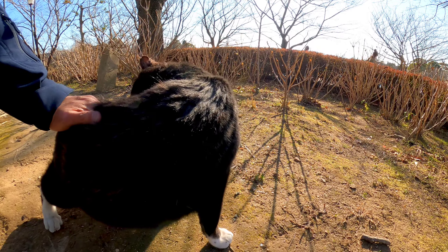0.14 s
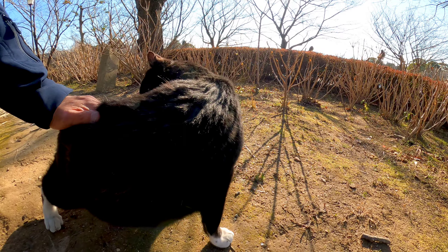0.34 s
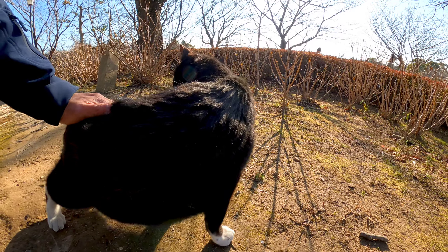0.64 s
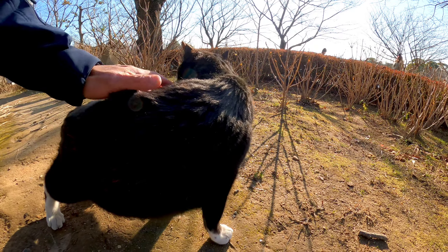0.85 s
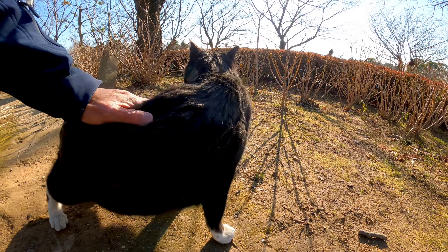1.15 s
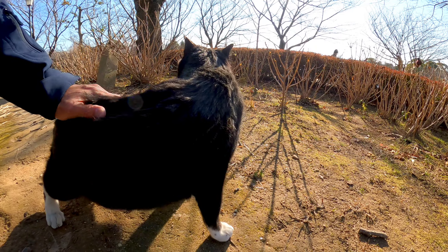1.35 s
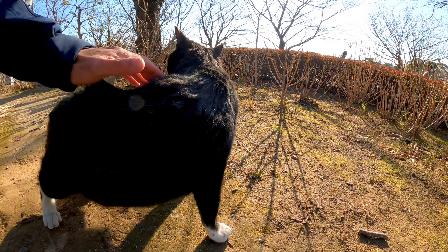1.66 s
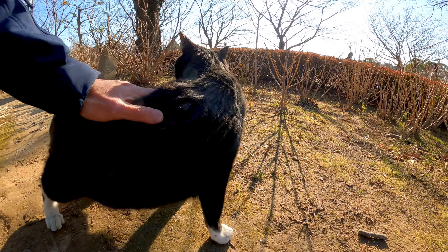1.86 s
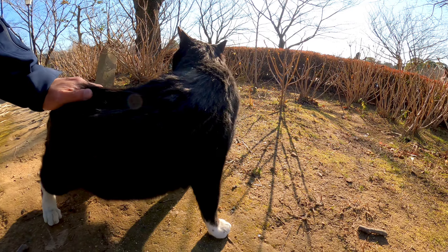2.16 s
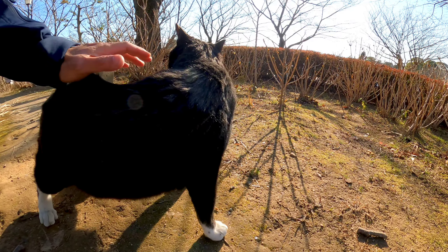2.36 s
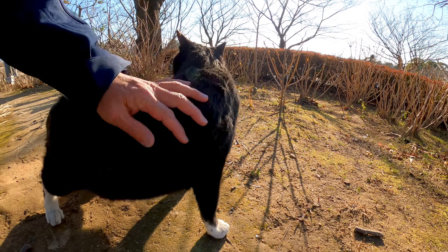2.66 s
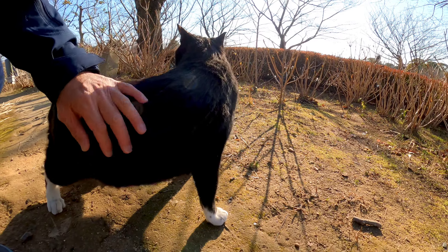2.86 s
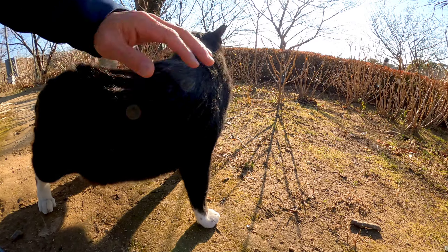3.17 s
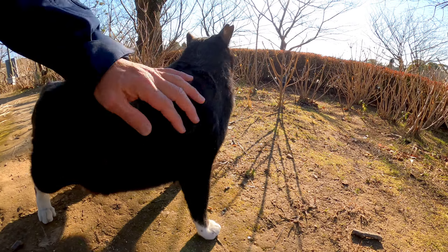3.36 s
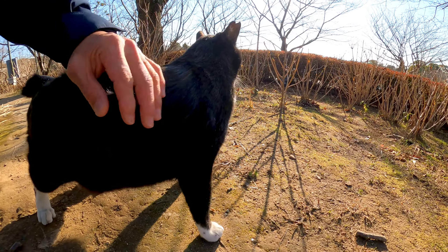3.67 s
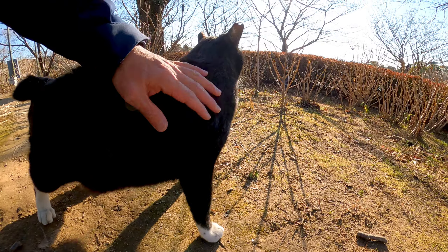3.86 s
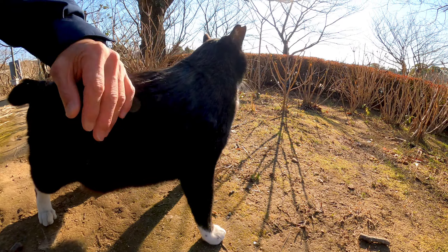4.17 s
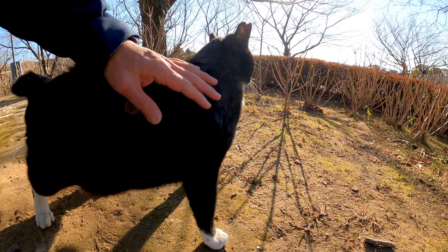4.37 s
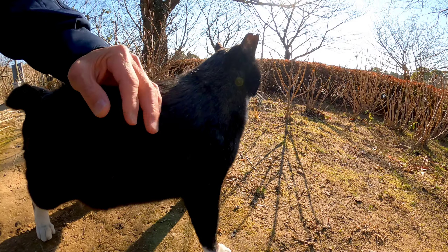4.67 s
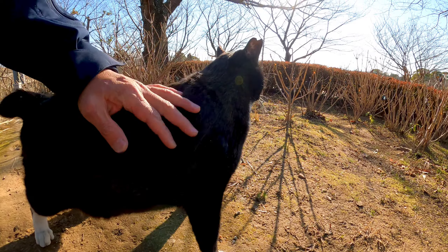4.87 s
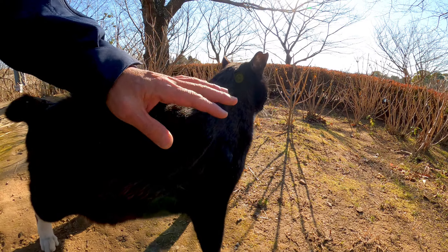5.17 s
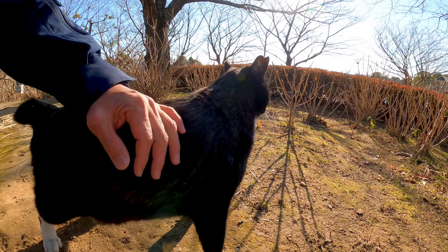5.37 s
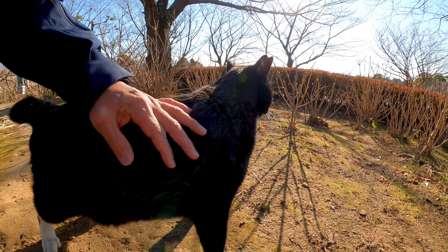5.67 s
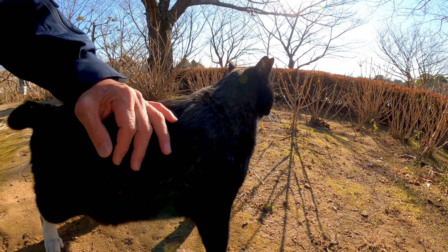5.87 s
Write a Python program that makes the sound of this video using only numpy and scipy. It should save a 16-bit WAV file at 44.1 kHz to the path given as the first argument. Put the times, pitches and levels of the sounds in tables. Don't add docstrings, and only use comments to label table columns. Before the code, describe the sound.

An open park with a continuous dark rumble of far traffic and faint low engine hums that swell and fade. Very close to the microphone, a hand pats fur at about 0.1 s, soft with tiny dry snaps, more lightly at 0.65 s, and more firmly at 1.15 s. Short brushing strokes follow around 1.7 s, and a slow last pat comes at 2.2 s. A heavy vehicle, distant until then, grows from about 2 s behind a hedge: a deep, steady, slightly wavering engine drone near the bottom of hearing, pulsing body roar and a widening hiss of tyres and exhaust. It is loudest and brightest around 4.5 s, with the tone shifting through echoes and hedge gaps. From 5 s it recedes, heard from behind, the hiss dulling while the drone lingers. A faint fur stroke brushes at 5.8 s, and the sound ends near 6 s with the vehicle still audible.

```python
import sys
import numpy as np
from scipy import signal
from scipy.fft import rfft, irfft, next_fast_len
from scipy.io import wavfile

SR = 44100
rng = np.random.default_rng(int(sys.argv[2]) if len(sys.argv) > 2 else 0)


def waveform_to_disk(signal):
    frames = np.transpose(np.atleast_2d(signal))
    scaled = np.clip(frames, -1, 1) * 32767
    samples = np.round(scaled).astype(np.int16)
    wavfile.write(sys.argv[1], SR, samples)


def to_linear_factor(level_db):
    exponent = np.asarray(level_db, float) / 20
    return 10 ** exponent


N = 265482
TIME = np.arange(N) / SR
PADDED = next_fast_len(N + SR // 10)
FREQ = np.fft.rfftfreq(PADDED, 1 / SR)

# [t/s, level re closest point/dB]
NEARNESS = [(0, -13), (.4, -14), (.9, -13.5), (1.2, -13.5), (1.63, -14), (2.23, -11), (2.83, -8.5),
            (3.19, -6.5), (3.45, -5.5), (3.67, -4.5), (3.92, -3), (4.07, -2), (4.25, -1.3), (4.56, 0),
            (5.16, -2), (5.52, -4), (5.77, -5.5), (6.02, -6)]
# [t/s, share still far/0-1, share from behind/0-1]
VIEW = [
    (1.5, 0.56, 0.03),
    (3.3, 0, 0),
    (4.6, 0.01, 0.11),
    (5.5, 0.02, 0.74),
]


def curves(table):
    s, *columns = np.transpose(table)
    return [np.interp(TIME, s, column) for column in columns]


def bump(t, centre_s, half_s):
    return np.exp(-0.5 * ((t - centre_s) / half_s) ** 2)


def unit(x):
    return x / np.sqrt(np.mean(x ** 2))


def walk(rate_hz):
    levels = rng.standard_normal(1400)
    place = TIME * min(rate_hz, 190)
    k = place.astype(int)
    blend = np.sin(np.pi / 2 * (place - k)) ** 2
    return 1.24 * (levels[k] + (levels[k + 1] - levels[k]) * blend)


def noise(colour, flicker_db, rate_hz):
    hz, db = np.transpose([point for point in colour if point[1] > -80])
    octave = np.log2(np.maximum(FREQ, 1))
    colour_db = np.interp(octave, np.log2(hz), db, -200, -200)
    spectrum = rfft(rng.standard_normal(PADDED)) * to_linear_factor(colour_db)
    out = 0
    for centre in np.arange(np.log2(hz[0]), np.log2(hz[-1]) + 1):
        share = np.cos(np.pi / 2 * np.clip(octave - centre, -1, 1)) ** 2
        band = irfft(spectrum * share, PADDED)[:N]
        out = out + band * to_linear_factor(flicker_db * walk(rate_hz))
    return unit(out)


def engine():
    # [t/s, firing rate/Hz]
    firing = [(2.3, 32.42), (2.97, 32.37), (3.2, 32.86), (3.37, 32.59), (3.63, 32.5), (3.77, 31.96),
              (3.86, 32.37), (4.04, 32.04), (4.55, 31.83), (4.77, 31.75), (4.95, 31.56), (5.19, 31.6),
              (5.3, 31.46), (5.42, 31.47), (5.95, 31.45), (6.02, 31.5)]
    # [from the front/dB, from behind/dB]
    stack = [(-47, -42), (-32.5, -35), (-45, -53.5), (-41.5, -39.5), (-41.5, -33), (-41.5, -34),
             (-44.5, -41), (-51, -36), (-49.5, -49), (-51.5, -50), (-56, -51.5), (-50.5, -48)]
    # [t/s, half length/s, f/Hz, lift/dB]
    swells = [(.42, 0.077, 65.4, 4), (1.2, .07, 65, 2), (2.05, 0.078, 65, 6), (2.47, 0.095, 65, 5.5),
              (3.24, 0.21, 65, 6), (4, 0.051, 64, 7), (5.1, 0.078, 63, 1), (6, 0.28, 63, 3.5),
              (0.54, 0.14, 143.5, 6), (1.37, 0.073, 140, 10.5), (3.6, 0.25, 140, 2.5),
              (4.556, 0.19, 120, 11.5), (5.26, 0.09, 126, 8), (3.3, 0.054, 150, 3), (3.4, 0.077, 162, 7.5),
              (3.7, 0.058, 134, 6.5), (3.775, 0.073, 180, 11), (4.3, 0.065, 160, 3),
              (4.654, 0.15, 162.6, 10), (5.195, 0.081, 157, 11), (5.71, 0.17, 157, 6.5),
              (2.98, 0.26, 197, 5.5), (3.7, 0.081, 178, 3), (5.2, 0.065, 181, 5.5), (4.8, 0.14, 190, 4.5),
              (5.676, 0.2, 189, 3.5), (4.34, 0.34, 223, 6.5), (4.1, 0.031, 378, 11.5), (3.8, 0.077, 300, 7),
              (4.64, .15, 348, 6.5), (3.6, .12, 32, 3), (4.45, .1, 30, 4), (5.9, .12, 29, 7.5),
              (6.5, .1, 39, 9), (5.4, 0.083, 121.1, 7.5), (5.85, 0.1, 126, 5.5), (5.2, 0.13, 240, 5),
              (3.77, .12, 223, -12), (5.25, 0.054, 220, -7.5), (4.5, 0.06, 315, 9.5), (3.5, 0.11, 300, 7),
              (6.6, .07, 400, 4), (5.25, 0.08, 410, 4), (5.55, 0.059, 283, 7), (3.84, 0.14, 290, 5),
              (4.16, .12, 280, -13), (3.32, 0.17, 388, 6.5), (3.57, 0.089, 90, 9), (3.65, 0.13, 247, 7),
              (5.08, 0.052, 200, 8.5), (5.567, 0.22, 214, 4), (4.65, .08, 245, 8),
                    (5.3, 0.12, 270, -3.5), (3.75, 0.079, 258, 4.5), (5.87, 0.084, 260, 5),
                    (4.17, 0.071, 321, 12), (4.8, 0.077, 290, 4), (3.44, 0.13, 280, 5.5),
                    (4.2, 0.063, 347.6, 6), (5.47, .12, 346, 9), (4.55, .1, 349, 3.5),
                    (3.9, 0.27, 387, -3.5), (4.5, .1, 140, 3), (4.15, .1, 154, 4), (3.6, .1, 88, 2.5),
                    (4.88, .06, 162, 2.5), (4.4, .08, 210, 2.5), (3.97, .07, 65, -5), (4.32, .08, 64, 3),
                    (3.95, .1, 194, 4), (4.45, .1, 285, 3), (4.5, .06, 160, 3), (5.95, .1, 158, 2)]
    first_firing_s, swell_hz, fading_db = 0.0092, 14, 0.5
    firing_hz = curves(firing)[0]
    turns = np.cumsum(firing_hz * (1 + 0.002 * walk(9))) / SR - first_firing_s * firing_hz[0]
    near_db = 0.81 * curves(NEARNESS)[0]
    rear = curves(VIEW)[1]
    coarse_s, coarse_hz = TIME[::64], firing_hz[::64, None]
    s, half_s, hz, lift_db = np.transpose(swells)
    swelling_db = lift_db * bump(coarse_s[:, None], s, half_s)
    out = 0
    for order, (front_db, rear_db) in enumerate(stack, 1):
        in_step = np.exp(-0.5 * ((order * coarse_hz - hz) / swell_hz) ** 2)
        order_swell_db = np.interp(TIME, coarse_s, np.sum(swelling_db * in_step, axis=1))
        view_db = front_db + (rear_db - front_db) * rear
        shimmer_db = fading_db * walk(5) + 0.031 * order * walk(5.3)
        phase = 2 * np.pi * order * turns - 0.04 * order ** 2 + 0.03 * order * walk(7)
        level_db = view_db + near_db + order_swell_db + shimmer_db
        out = out - to_linear_factor(level_db) * np.sqrt(2) * np.cos(phase)
    return out, turns


def layer_db(closest_db, loss_db):
    near_db = curves(NEARNESS)[0]
    return closest_db + near_db - loss_db * (to_linear_factor(-near_db) - 1)


def arm_shade_db():
    # [t/s, half length/s, level/dB]
    shades = [
        (.22, .06, -3.5),
        (0.526, 0.11, -4.5),
        (.81, .06, -4),
        (1.5, .12, 1),
        (2.42, .04, -3),
        (3.3, .2, -0.5),
        (5.9, 0.32, -2.5),
    ]
    return sum(db * np.exp(-((TIME - s) / half_s) ** 2) for s, half_s, db in shades)


def vehicle():
    # [f/Hz, level/dB per Hz]
    roar_abreast = [(50, -28.5), (80, -5), (130, -7.5), (210, -13), (280, -11), (350, -9.5), (450, -21),
                    (750, -22), (1020, -36.5), (1300, -47.5), (1800, -65.5)]
    # [f/Hz, level/dB per Hz]
    roar_rear = [(50, -15), (85, -11.5), (130, -16.5), (165, -13.5), (215, -10), (300, -11.5), (420, -21),
                 (600, -18.5), (790, -18.5), (950, -33), (1300, -33.5), (1800, -65)]
    # [f/Hz, level/dB per Hz]
    tyres_abreast = [(530, -18), (900, -1.5), (1020, -3.5), (1300, -2), (1580, -2.5), (2220, -6.5),
                     (2390, -6.5), (2560, -6.5), (2780, -8.5), (3090, -9.5), (4090, -14.5), (4590, -21.5),
                     (5500, -27.5), (7150, -49), (12100, -120)]
    # [f/Hz, level/dB per Hz]
    tyres_far = [(530, -22.5), (900, -6), (1050, -3.5), (1610, -7), (1960, -8.5), (2220, -10), (2800, -26),
                 (5500, -49.5), (7150, -70), (12100, -120)]
    # [f/Hz, level/dB per Hz]
    tyres_rear = [(530, -22.5), (900, -0.5), (942, -9.5), (1030, -11), (1420, -5.5), (1880, -8),
                  (2070, -3.5), (2430, -12.5), (3020, -10), (3740, -10), (4450, -20.5), (5500, -36),
                  (7150, -55.5), (12100, -120)]
    # [f/Hz, level/dB per Hz]
    gas_colour = [(2650, -31), (4500, -3), (5430, -2.5), (6090, -6), (7660, -7.5), (9500, -14),
                  (12400, -32), (20900, -120)]
    # [f/Hz, level/dB per Hz]
    top_colour = [(5290, -27), (9000, -9.5), (10000, 0), (11000, -4.5), (12200, -1.5), (13200, -1.5),
                  (14400, -7.5), (15000, -10.5)]
    orders, turns = engine()
    far, rear = curves(VIEW)
    abreast = np.maximum(1 - far - rear, 0)
    shade_db = arm_shade_db()
    gust_db = 0.26 * walk(21) + 0.36 * walk(45)

    puff = 1 + 0.059 * np.cos(2 * np.pi * turns)
    roar = np.sqrt(1 - rear) * noise(roar_abreast, 0.74, 11)
    roar = roar + np.sqrt(rear) * noise(roar_rear, 0.38, 21)
    roar = to_linear_factor(layer_db(-33.5, 0.34)) * puff * roar

    tyres = np.sqrt(far) * noise(tyres_far, 0.26, 22)
    tyres = tyres + np.sqrt(rear) * noise(tyres_rear, 0.24, 26)
    tyres = tyres + np.sqrt(abreast) * noise(tyres_abreast, 0.27, 24)
    tyres = to_linear_factor(layer_db(-46.05, 0.01) + 0.27 * shade_db + gust_db) * tyres

    gas_db = layer_db(-63.36, 0.046) + shade_db + 1.2 * gust_db
    gas = to_linear_factor(gas_db) * noise(gas_colour, 0.64, 25)
    top_db = layer_db(-78.6, 1.2) + 1.5 * shade_db + 1.5 * gust_db
    top = to_linear_factor(top_db) * noise(top_colour, 0.6, 13)
    return orders, roar + tyres + gas + top


def band_swells(far):
    # [t/s, half length/s, f/Hz, width/Hz, lift/dB]
    band_lifts = [(4.07, .16, 3200, 630, 5), (3.3, 0.073, 2900, 400, 2.5), (4.7, 0.12, 3244, 420, 3.5),
                  (4.5, 0.36, 4137, 760, 4), (5.1, 0.11, 2600, 300, 4.5), (4.096, 0.22, 2700, 280, -4.5),
                  (3.33, .14, 3500, 2000, -2.5), (5.75, 0.18, 3720, 300, 4), (5.85, .1, 5000, 700, 5),
                  (4.5, 0.09, 1150, 450, 3), (2.37, 0.22, 1170, 390, -4.5), (2.95, 0.22, 1150, 590, -5),
                  (3.6, 0.19, 770, 330, -3.5), (.33, .12, 1080, 210, 4.5), (1.38, 0.11, 6000, 900, 7),
                  (2.9, 0.43, 8000, 2500, 2.5), (1.85, .25, 8000, 1500, 3.5), (0.54, .12, 3900, 900, -10),
                  (5.95, 0.092, 1900, 400, -4.5), (5.6, 0.12, 760, 180, 3.5), (4.3, .08, 5310, 500, 2),
                  (4.4, .1, 4600, 500, 1), (4.5, 0.092, 280, 90, -8), (3.12, 0.19, 320, 76, -5),
                  (5.75, .1, 1450, 400, 3.5), (.9, .12, 6400, 1200, 3.5), (1.86, 0.13, 640, 220, 2),
                  (4.55, 0.13, 11000, 1310, 7), (.6, 0.05, 48, 32, -7), (0.23, 0.13, 60, 70, -6),
                  (4.75, .1, 57, 34, -8), (4.3, 0.086, 230, 60, 4), (1.35, 0.12, 330, 97, -8),
                  (1.8, 0.046, 360, 74, 4), (4.3, 0.053, 590, 120, 6), (2.3, 0.05, 130, 40, -6),
                  (.4, 0.045, 218, 47, 5), (0.85, 0.15, 165, 52, 5.5), (3.3, 0.056, 2750, 460, -4),
                  (0.376, 0.048, 50, 26, 6)]
    out = far.copy()
    for s, half_s, hz, width_hz, db in band_lifts:
        near = slice(max(int((s - 3 * half_s) * SR), 0), int((s + 3 * half_s) * SR))
        edges_hz = [hz - width_hz / 2, hz + width_hz / 2]
        sos = signal.butter(1, edges_hz, "bandpass", fs=SR, output="sos")
        band = signal.sosfiltfilt(sos, far[near])
        lift_db = db * np.exp(-((TIME[near] - s) / half_s) ** 2)
        out[near] += (to_linear_factor(lift_db) - 1) * band
    return out


def hand():
    # [t/s, peak level/dB, rise/s, fall/s, palm slap/dB]
    pats = [
        (.0975, -40.5, 0.013, 0.027, -12),
        (.6435, -45.5, 0.0015, 0.03, -11),
        (1.1495, -40, 0.004, 0.045, -4),
        (2.21, -43, 0.0089, 0.048, -13),
    ]
    # [t/s, peak level/dB, rise/s, brightness/dB]
    strokes = [(.33, -60, .03, 0), (.654, -47, .004, -6), (.671, -48.5, 0.008, -6), (1.138, -48, .004, -6),
               (1.06, -57, 0.033, 6), (1.668, -46, .006, -8), (1.71, -55, .02, -6),
               (1.747, -45.5, 0.01, -8), (1.785, -52, .015, -9), (2.12, -59, 0.046, 11), (5.8, -51, .02, 5)]
    # [f/Hz, level/dB per Hz]
    fur_colour = [(820, -40.5), (1400, 1.5), (1630, 1), (2420, -9.5), (2830, -1), (5240, -9.5),
                  (6110, -13.5), (9610, -23.5), (14000, -40)]
    # [f/Hz, level/dB per Hz]
    palm_colour = [(1500, -31), (2300, -10), (2800, 6), (3300, -7), (3700, -1.5), (4300, -10), (6500, -30)]
    pat_bright_db, stroke_fall_s, stroke_slap_db = 0.5, 0.04, -20
    touches = [(s, db, rise_s, fall_s, pat_bright_db, slap_db) for s, db, rise_s, fall_s, slap_db in pats]
    touches += [(s, db, rise_s, stroke_fall_s, bright_db, stroke_slap_db)
                for s, db, rise_s, bright_db in strokes]
    dull, bright, slap = 0, 0, 0
    for s, db, rise_s, fall_s, bright_db, slap_db in touches:
        before, after = np.minimum(TIME - s, 0), np.maximum(TIME - s, 0)
        press = to_linear_factor(db - 15) * np.exp(before / rise_s - after / fall_s)
        dull = dull + press
        bright = bright + press * to_linear_factor(bright_db)
        slap = slap + to_linear_factor(db - 10.5 + slap_db) * np.exp(before / 0.002 - after / 0.0074)
    fur = noise(fur_colour, 0.3, 60) * to_linear_factor(1.2 * walk(180))
    low = signal.sosfilt(signal.butter(2, 5500, fs=SR, output="sos"), fur)
    return dull * low + bright * (fur - low) + slap * noise(palm_colour, 0.1, 60)


def snaps():
    # [t/s, peak level/dB, f/Hz, ring t60/s]
    snap_events = [(.0895, -44, 3200, .008), (.092, -48, 6200, .006), (.0985, -42, 3100, .008),
                   (.104, -42, 2600, .008), (.119, -49, 3000, .01), (.128, -51, 3200, .008),
                   (.6435, -53, 2900, .008), (.651, -49, 3100, .01), (.653, -52, 5000, .01),
                   (0.661, -50, 3300, .008), (.672, -50, 2900, .012), (1.148, -46, 2820, .01),
                   (1.153, -43, 2700, .015), (1.15, -48, 4100, .008), (1.157, -46, 3700, .01),
                   (.644, -51, 4400, .008), (1.172, -50, 3200, .008), (1.663, -54, 2400, .01),
                   (.664, -52, 4700, .01), (.678, -54, 4200, .01), (.69, -54, 5200, .008),
                   (1.163, -50, 4910, .008), (2.2045, -51, 2300, .008), (2.211, -47, 3000, .01),
                   (.884, -39, 660, .03), (1.491, -42, 704, .03)]
    out, age_s = np.zeros(N + SR), np.arange(SR // 20) / SR
    for s, db, hz, t60_s in snap_events:
        envelope = to_linear_factor(db - 60 * age_s / t60_s) * (1 - np.exp(-age_s * hz))
        out[int(s * SR):][:len(age_s)] += envelope * np.sin(2 * np.pi * hz * age_s)
    return out[:N]


def town():
    # [f/Hz, level/dB per Hz]
    town_colour = [(8.8, -29), (15, 0), (38, 2), (76, -3), (97, -4), (132, -6.5), (191, -12), (218, -9.5),
                   (250, -14.5), (382, -25.5), (412, -25.5), (530, -24.5), (1500, -47.5), (1950, -69.5),
                   (3300, -120)]
    return to_linear_factor(-30.7) * noise(town_colour, 0.31, 5.16)


def hums():
    # [t/s, half length/s, f/Hz, rms level/dB]
    hum_events = [(.35, 0.11, 38, -34), (0.805, 0.11, 35, -31.5), (1.52, .15, 31.3, -37),
                  (.4, .12, 218, -44), (0.644, 0.12, 219, -47.5), (1.05, 0.15, 180, -45),
                  (1.6, 0.17, 230, -46.5), (2.05, .12, 180, -50), (2.38, 0.13, 228, -48),
                  (2.6, 0.17, 195, -46), (0.72, .15, 380, -55), (0.71, 0.12, 355, -51.5),
                  (1.4, 0.22, 385, -56), (2.365, 0.19, 383, -52.5), (2.05, 0.094, 290, -50),
                  (1.15, 0.12, 78, -38.5), (2.83, .15, 53, -38.5), (1.78, .1, 388, -58.5)]
    waver_rad = 0.4 * walk(6)
    out = 0
    for s, half_s, hz, db in hum_events:
        tone = np.sqrt(2) * np.sin(2 * np.pi * hz * TIME + waver_rad)
        out = out + to_linear_factor(db) * bump(TIME, s, half_s) * tone
    return out


def scene():
    orders, hiss = vehicle()
    mix = orders + band_swells(hiss + town()) + hand() + snaps() + hums()
    return mix[None]


def low_pass(x):
    return signal.sosfilt(signal.butter(12, 15170, fs=SR, output="sos"), x)


def record(dry):
    # [f/Hz, width/Hz, lift/dB]
    port = [
        (3165, 410, 3),
        (7870, 790, 3),
        (12060, 800, 6),
    ]
    gain_db = sum(db / (1 + ((FREQ - hz) / (width_hz / 2)) ** 2) for hz, width_hz, db in port)
    from_edge_s = np.minimum(TIME, TIME[-1] - TIME)
    edge_fade = np.sin(np.pi / 2 * np.clip(from_edge_s / 0.004, 0, 1)) ** 2
    padded = np.pad(dry * edge_fade, ((0, 0), (0, PADDED - N)), "linear_ramp")
    mix = irfft(rfft(padded) * to_linear_factor(gain_db), PADDED)[:, :N]
    return low_pass(mix)


dry = scene()
out = record(dry)
waveform_to_disk(out)
```